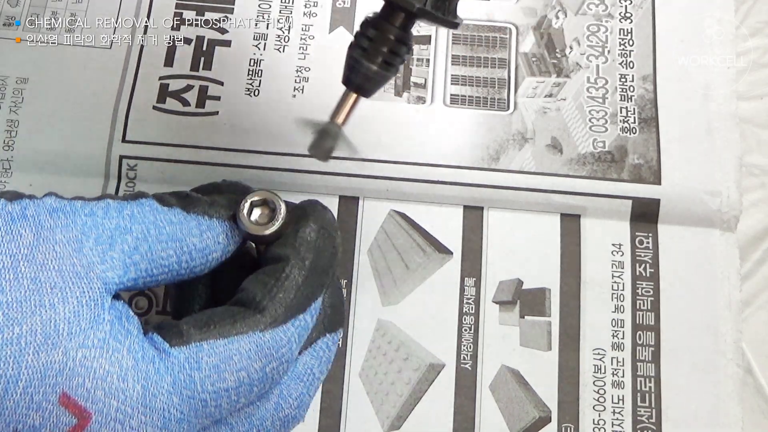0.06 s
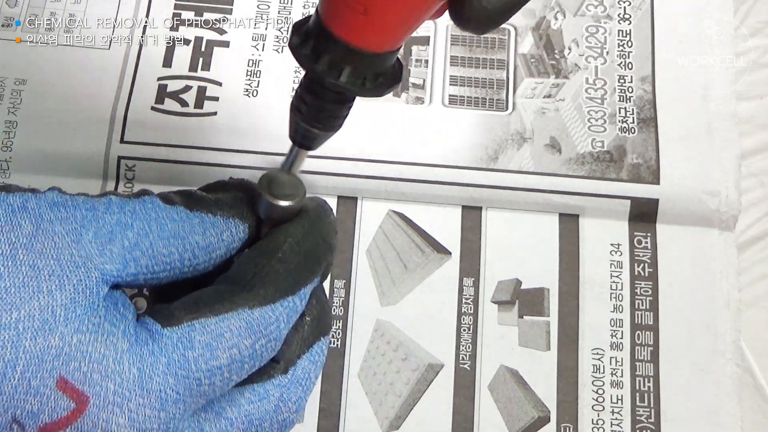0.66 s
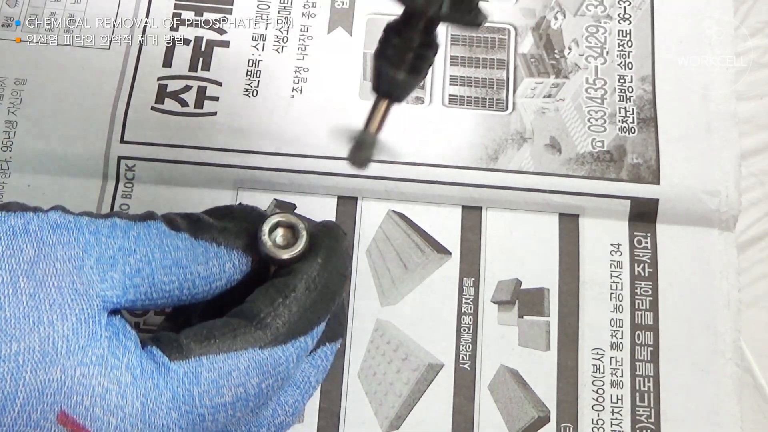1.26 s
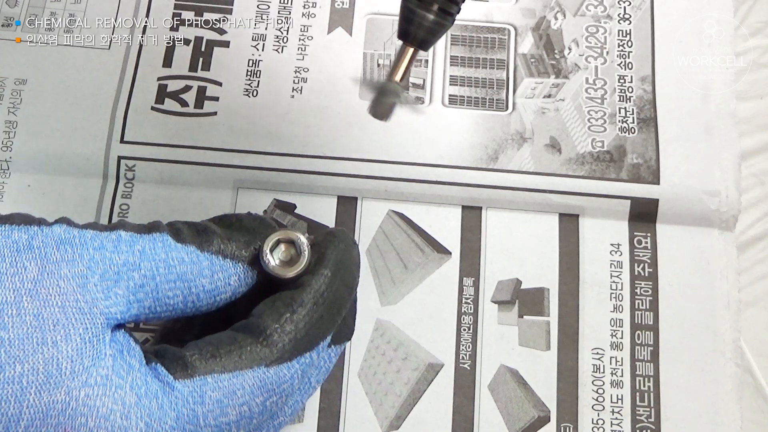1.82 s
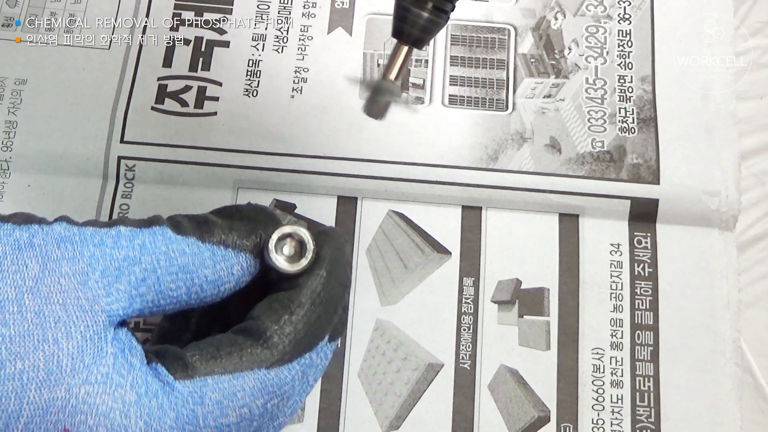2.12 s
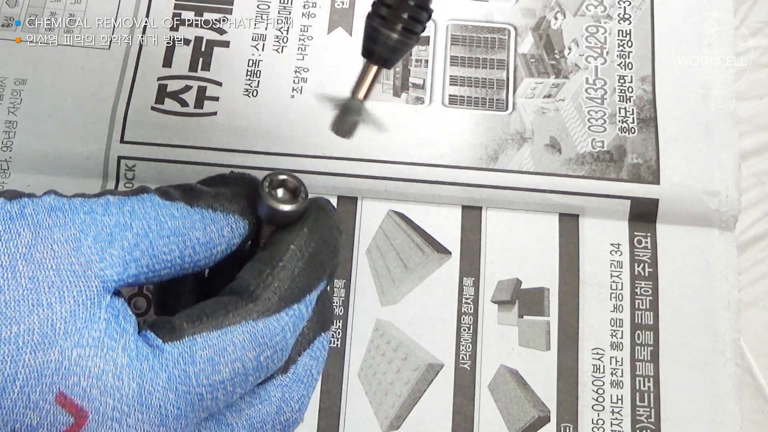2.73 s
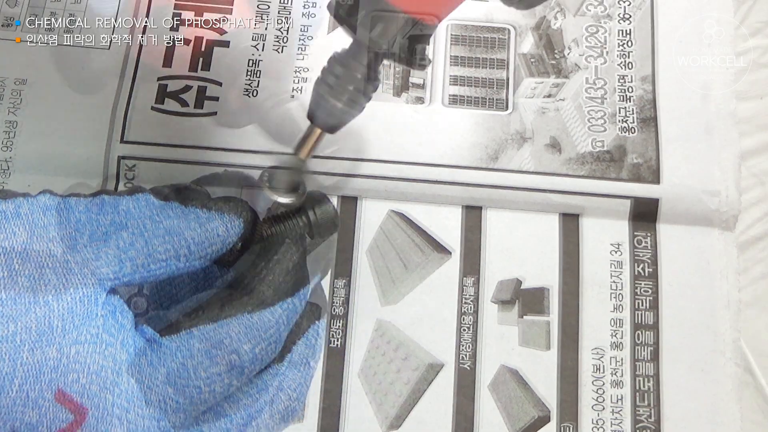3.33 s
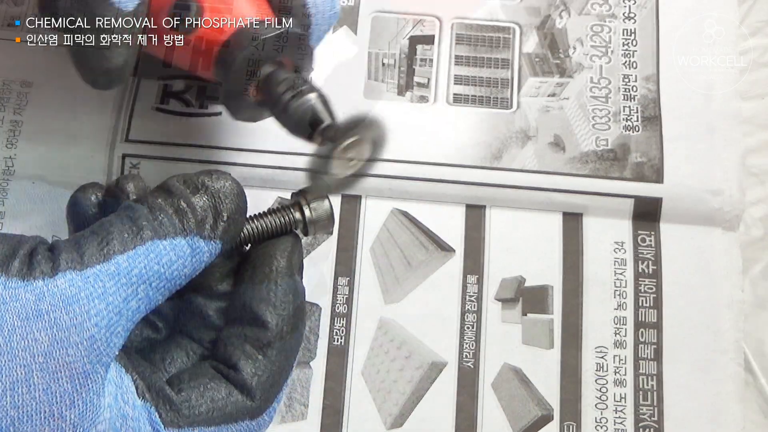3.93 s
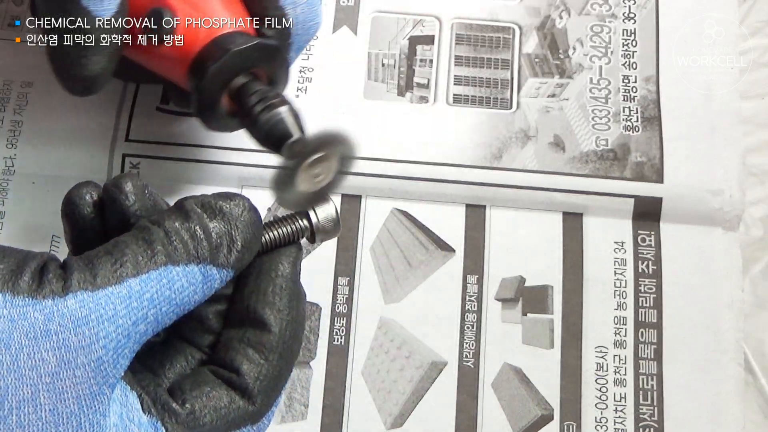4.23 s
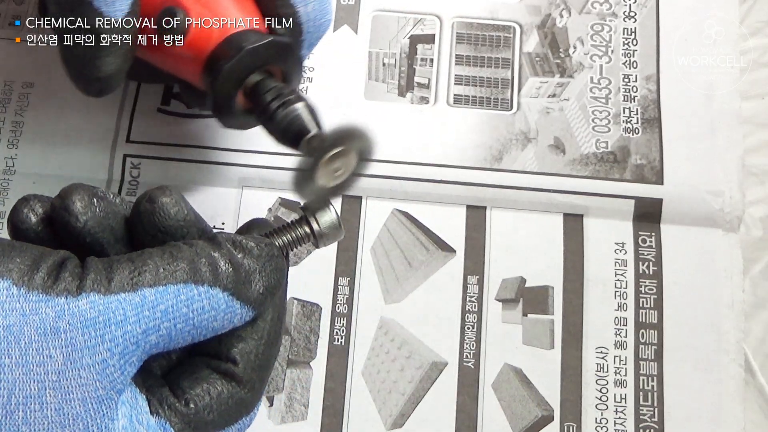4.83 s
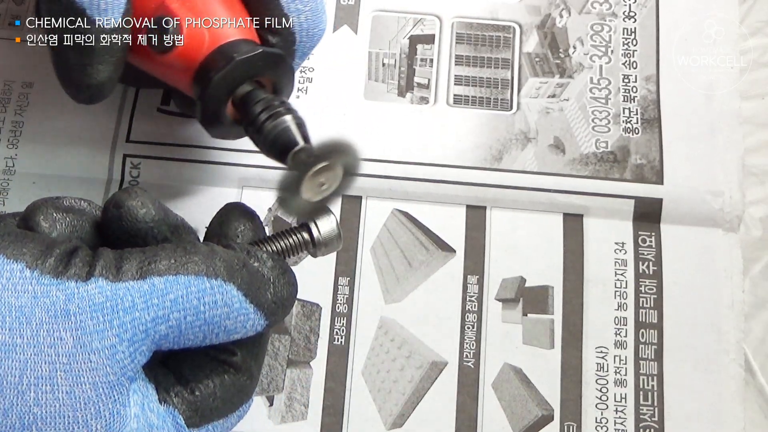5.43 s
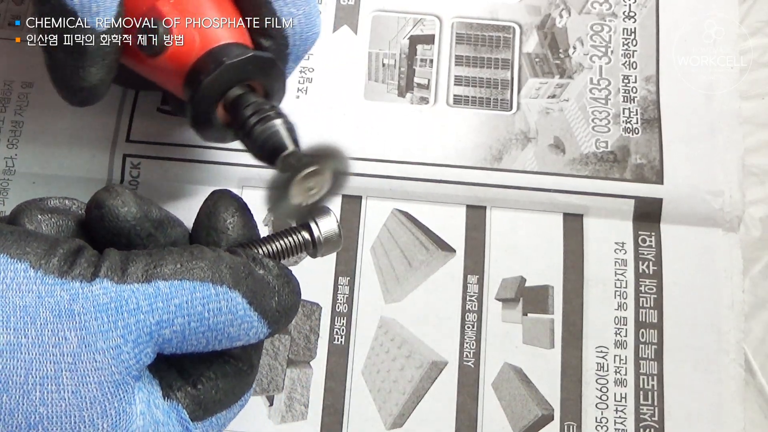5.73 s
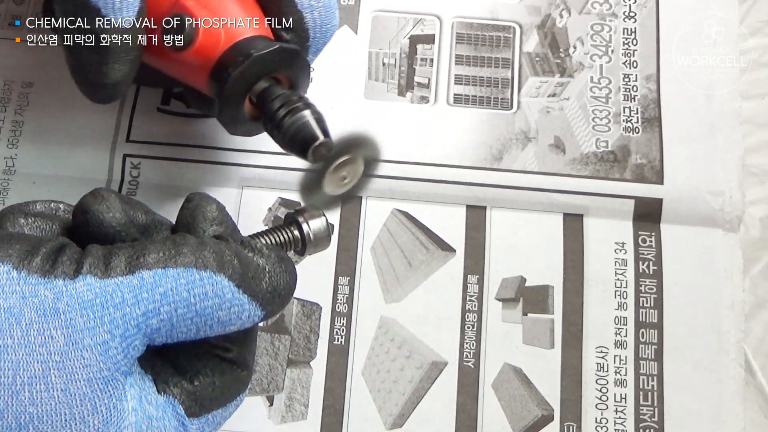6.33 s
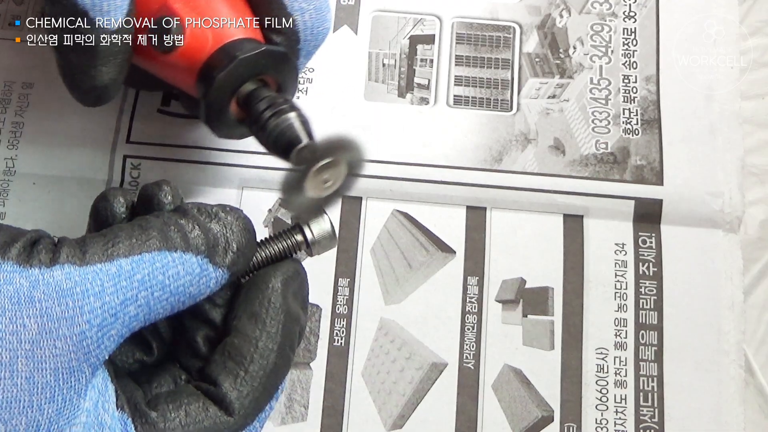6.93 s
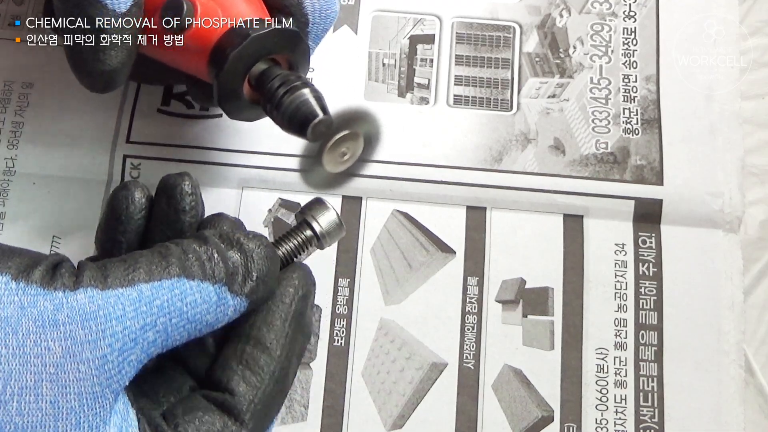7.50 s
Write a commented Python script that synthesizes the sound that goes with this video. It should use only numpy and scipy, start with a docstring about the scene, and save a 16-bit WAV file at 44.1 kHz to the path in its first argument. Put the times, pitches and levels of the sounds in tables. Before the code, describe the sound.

A handheld rotary tool whines high and hisses as wire brushes scrub a steel bolt, briefly spinning free at a lower pitch in between.

```python
"""A handheld rotary tool cleans a steel bolt with wire brushes, close by. First an end brush skims the
head, hurried and high-pitched: shaft, eight-bar commutator and ball bearings whine over fan air and
wire scratch. At 1.2 s this cuts to the tool spinning free at natural pace, much lower, creeping up.
From 3.1 s it loses speed and cuts out at 4.1 s, leaving a faint hush. Also from 3.1 s to the end,
a wire wheel works the thread, hurried and high again, its whine sagging under every press."""
import sys
import numpy as np
from scipy import signal
from scipy.fft import rfft, irfft, next_fast_len
from scipy.io import wavfile

SR = 44100
rng = np.random.default_rng(int(sys.argv[2]) if len(sys.argv) > 2 else 0)


def write(x):
    x = np.atleast_2d(x).T
    wavfile.write(sys.argv[1], SR, np.round(np.clip(x, -1, 1) * 32767).astype(np.int16))


N = 337806

MAINS_PULSE_HZ, HURRY = 120, 3.4  # in the hurried stretches, the mains pulses come HURRY times faster
EDGE_HZ = 15780  # top of the audible band
BALL_PASS = 4.362  # bearing ball passes per shaft turn

# End brush pushed onto the bolt head: start t/s, length t/s, drag/share of free speed
TIP_PRESSES = [(0, .25, .022), (.246, .064, .147), (.615, .65, .05), (.68, .6, .058)]
# Bed of steadier whine: f/shaft speed, relative level/dB
TIP_TONES = [(3.362, -46.5), (4, -48.5), (5, -69), (6, -61), (6.362, -55.5), (7.362, -54.5), (7.724, -47),
             (8.362, -51), (8.724, -46.5), (9, -66), (9.724, -50), (10, -62), (10.724, -58), (11, -50),
             (11.086, -48), (11.724, -55), (12, -57), (12.724, -45), (13, -58), (13.086, -54)]
# Lead voices, a row per LEAD_ORDERS entry: unloaded relative level/dB, level/dB gained per unit drag
TIP_LEAD = [(-62, -48), (-76.5, 25), (-42, -14), (-42, 5), (-45.5, 16), (-47, 24)]
# Peaks and notches of the held tool that the leads glide through: f/Hz, width f/Hz, level/dB of boost
TIP_COLOUR = [(1112, 116, -16.6), (1264, 69, 4.6), (5009, 152, 4.9), (5314, 78, -8.3), (6344, 157, 4.7),
              (6915, 253, 5.4), (8942, 639, -8.4), (10114, 288, -4.0), (13878, 626, -9.5),
              (14575, 297, 8.0)]
# Bright rush of fan air and wires: f/Hz, relative level/dB per Hz
TIP_RUSH = [(900, -138), (1600, -128), (2000, -108), (2800, -96.5), (3600, -84.5), (5000, -77), (5700, -74),
            (6700, -84), (8200, -86), (9300, -84), (11000, -81.5), (13000, -84), (15700, -78)]


def tip_brush():
    """The small end brush skims the bolt head, hurried; it snags briefly and the whine dips in pitch."""
    span = 0, 1.192
    speed = labour(TIP_PRESSES, span, start_hz=1114, free_hz=1338, tremor=.005, tremor_hz=21)
    t, hz, turns = shaft(speed, *span, jitter=0.00078, jitter_hz=59.7)
    snag = [(.05, 2), (.1, 2.5), (.19, 1.5), (.22, 2), (.265, 1.5), (.29, 2), (.33, 1.5), (.36, 4.5),
            (.41, 2)]  # t/s, level/dB added to the whine
    tones = whine(t, turns, TIP_TONES, HURRY, flutter=0.25, flutter_hz=39.74, sidebands=TIP_SIDEBANDS)
    leading = lead(t, hz, turns, drag(TIP_PRESSES, t), TIP_LEAD, TIP_COLOUR,
                   shaft_flutter=.04, flutter=0.13, flutter_hz=51.5, chatter_db=21, chatter_hz=69.7)
    motor = (amp(-3.4) * tones + amp(-1.04) * leading) * amp(curve(snag, t)[0])
    rush = noise(TIP_RUSH, len(t), ripple_db=4.0, ripple_hz=59.9)
    rush *= throb(t, turns, HURRY, turn_depth=0.086, mains_depth=0.16)
    ring = rim_scrape(t, ring_db=-68.5)
    haze = rattle(hz, turns, TIP_RUSH, over_db=21.5, low_hz=5800, count=20)
    sound = motor + amp(-2.0) * rush + ring + haze
    return place(t, sound, side_db=-20.5, balance_db=-0.8, room_db=-17.5, apart_hz=2000)


# Wheel on the thread, long strokes with short bites on top: start t/s, length t/s, drag/share of speed
WHEEL_PRESSES = [(3.205, 0.58, 0.106), (3.397, 0.372, 0.079), (3.891, 1.276, 0.136), (4.01, 0.104, 0.107),
                 (4.203, 0.09, 0.092), (4.259, 0.265, 0.082), (4.662, 0.479, 0.055), (4.825, 0.317, 0.044),
                 (5.225, 1.272, 0.182), (5.384, 0.047, 0.241), (5.62, 0.191, 0.119), (6.009, 0.154, 0.093),
                 (6.646, 0.096, 0.175), (6.678, 0.468, 0.143), (6.883, 0.347, 0.074)]
# Bed of rough whine: f/shaft speed, relative level/dB
WHEEL_TONES = [(3, -55.5), (3.362, -54.5), (4, -56), (5, -54), (6, -51.5), (6.362, -63), (7, -58),
               (7.724, -52), (8.362, -61), (8.724, -66), (9, -52), (9.362, -53.5), (9.724, -46), (10, -56),
               (10.362, -53.5), (10.724, -50), (11, -56), (11.724, -53), (12, -55.5), (12.724, -47),
               (13, -50.5), (13.086, -53), (14, -45), (14.086, -49.5), (14.724, -49), (15, -49),
               (15.086, -46), (16, -41.5)]
# Lead voices, a row per LEAD_ORDERS entry: unloaded relative level/dB, level/dB gained per unit drag
WHEEL_LEAD = [(-67, -6.5), (-61.5, 18.5), (-49, 10), (-48, 2), (-49.5, -6.5), (-49, 9.5)]
# Peaks and notches of the held tool that the leads glide through: f/Hz, width f/Hz, level/dB of boost
WHEEL_COLOUR = [(907, 54, -27), (984, 23, 5), (1143, 182, 13), (1858, 286, 8), (3964, 170, 9),
                (4215, 234, 6), (4537, 210, 5), (4560, 98, -0.5), (5150, 91, -3), (6350, 580, 7.5),
                (7130, 1300, 11), (7815, 320, 4), (12250, 700, 5.5), (14000, 714, 11.5)]
# Hiss of fan air and wires: f/Hz, relative level/dB per Hz
WHEEL_RUSH = [(800, -127), (1400, -123), (1650, -108), (2000, -77.5), (2500, -82), (3300, -79.5),
              (4300, -75.5), (5300, -82), (6300, -76), (8300, -80.5), (9300, -75), (11200, -77.5),
              (13500, -72), (15700, -72)]


def wheel_brush():
    """The wire wheel works the thread, hurried; pressure slows the shaft and brings up the scratch."""
    span = 3.098, 7.67
    speed = labour(WHEEL_PRESSES, span, start_hz=1260, free_hz=1225, tremor=.026, tremor_hz=19)
    t, hz, turns = shaft(speed, *span, jitter=.0014, jitter_hz=110)
    pressure = np.clip((1020 - hz) / 100, -1, 1.5)  # the slower the shaft, the harder the push
    tones = whine(t, turns, WHEEL_TONES, HURRY, flutter=0.46, flutter_hz=36.01,
                  sidebands=WHEEL_SIDEBANDS)
    leading = lead(t, hz, turns, drag(WHEEL_PRESSES, t), WHEEL_LEAD, WHEEL_COLOUR,
                   shaft_flutter=0.17, flutter=0.13, flutter_hz=50.22, chatter_db=9.5, chatter_hz=54.9)
    motor = amp(-0.64) * housing(tones) + amp(0.83) * leading
    rush = noise(WHEEL_RUSH, len(t), ripple_db=2.2, ripple_hz=50)
    rush *= amp(0.63 * pressure + .5 * wander(len(t), SR / 25))
    wires = [(1000, -135), (1700, -108), (2000, -105), (3000, -92), (4200, -93), (5500, -97),
             (15000, -86)]  # f/Hz, relative level/dB per Hz
    scratch = noise(wires, len(t), ripple_db=1.0, ripple_hz=58.6) * np.maximum(pressure, 0) ** 2
    hiss = amp(-6.3) * rush + amp(-2) * scratch
    hiss *= throb(t, turns, HURRY, turn_depth=0.05, mains_depth=0.25)
    haze = rattle(hz, turns, WHEEL_RUSH, over_db=10, low_hz=4950, count=16)
    return place(t, motor + hiss + haze, side_db=-15.5, balance_db=0.0, room_db=-19.0, apart_hz=1200)


# Slow climb with the brush lifted off: t/s, shaft f/Hz
IDLE_SPEED = [(1.2, 336.5), (1.22, 334.3), (1.35, 340.2), (1.62, 348.8), (1.97, 357.6), (2.15, 360.3),
              (2.46, 363.7), (2.89, 367.4), (3.09, 368.2)]
# Dense, clean whine of shaft and bearings: f/shaft speed, relative level/dB
IDLE_TONES = [(1, -57), (2, -95), (3.362, -45), (4, -48.5), (4.362, -40.5), (5.362, -48), (6, -60.5),
              (6.362, -50.5), (7.724, -45), (8, -45.5), (8.362, -66), (8.724, -59), (9, -62),
              (9.362, -54.5), (9.724, -47), (10, -73), (10.086, -52), (11.724, -48), (12.086, -45.5),
              (13, -50), (13.086, -50), (14, -55), (14.086, -47.5), (15, -60), (15.086, -56), (15.448, -52),
              (16, -49), (16.086, -38.5), (16.448, -44), (17, -67), (17.086, -42.5), (17.448, -45.5),
              (18, -45), (18.086, -44), (18.448, -45.5), (19.448, -48), (19.81, -45), (20.448, -50),
              (20.81, -40), (21, -46.5), (21.448, -59), (22, -47), (22.81, -52.5), (23, -74),
              (23.81, -55.5), (24, -47), (24.81, -67), (25, -58), (25.172, -53), (25.81, -65), (26, -61),
              (26.172, -52), (26.81, -45), (27, -54), (27.172, -65), (27.534, -56), (28, -68),
              (28.172, -48.5), (29, -58), (29.172, -55), (29.534, -68), (30.172, -64)]
# Breath of the fan: f/Hz, relative level/dB per Hz
IDLE_RUSH = [(170, -123), (300, -103), (550, -94), (850, -88), (1100, -78.5), (1500, -67), (1750, -72.5),
             (2300, -80.5), (3000, -77), (4600, -74.5), (6300, -71), (8200, -75), (10500, -73),
             (15700, -87.5)]


def idling():
    """The tool spins freely and creeps up in speed."""
    t, hz, turns = shaft(IDLE_SPEED, start=1.188, end=3.102, jitter=0.00052, jitter_hz=25.63)
    tones = whine(t, turns, IDLE_TONES, pace=1, flutter=0.12, flutter_hz=16, sidebands=FREE_SIDEBANDS)
    rush = noise(IDLE_RUSH, len(t), ripple_db=4.5, ripple_hz=25.01)
    rush *= throb(t, turns, pace=1, turn_depth=0.16, mains_depth=0.098)
    haze = rattle(hz, turns, IDLE_RUSH, over_db=21.5, low_hz=2980, count=56)
    sound = amp(-1.02) * tones + amp(-1.73) * rush + haze
    return place(t, sound, side_db=-24.0, balance_db=-0.9, room_db=-16.5, apart_hz=553)


# Gentle droop of the motor running on: t/s, shaft f/Hz
SLOWING_SPEED = [(3.11, 352.4), (3.38, 352), (3.44, 349.8), (3.52, 344), (3.79, 331.9), (3.99, 324.3),
                 (4.11, 321.3)]
# Sparser, shakier whine: f/shaft speed, relative level/dB
SLOWING_TONES = [(1, -59.5), (2, -64.5), (3.362, -45), (4, -57), (4.362, -39.5), (5.362, -42), (8, -44.5),
                 (8.362, -61), (9.724, -43.5), (10, -49), (10.086, -43), (12.086, -43.5), (14, -50),
                 (14.086, -58), (16, -58), (16.086, -39), (16.448, -40), (17.086, -51), (18, -42),
                 (18.086, -40), (18.448, -53), (19.448, -49), (19.81, -57), (20.81, -39), (21, -54),
                 (27.172, -43.5)]
# Breath of the fan: f/Hz, relative level/dB per Hz
SLOWING_RUSH = [(170, -117), (300, -101), (550, -89.5), (850, -86), (1100, -77.5), (1500, -64.5),
                (1750, -75.5), (2300, -75), (3000, -73), (4600, -71), (6300, -68.5), (8200, -71.5),
                (10500, -72), (15700, -97)]


def slowing():
    """The motor loses speed with a stronger mains buzz; the wires graze the bolt near the end."""
    t, hz, turns = shaft(SLOWING_SPEED, start=3.098, end=4.1, jitter=0.00075, jitter_hz=24.7)
    tones = whine(t, turns, SLOWING_TONES, pace=1, flutter=0.32, flutter_hz=18.44,
                  sidebands=FREE_SIDEBANDS)
    rush = noise(SLOWING_RUSH, len(t), ripple_db=3.0, ripple_hz=24.72)
    rush *= throb(t, turns, pace=0.99, turn_depth=0.15, mains_depth=0.26)
    wires = [(1500, -100), (2800, -78), (4200, -69.5), (6000, -83), (9000, -82)]  # f/Hz, level/dB per Hz
    graze = noise(wires, len(t), ripple_db=-4, ripple_hz=59.7) * bump(t, centre=3.95, width=0.24)
    haze = rattle(hz, turns, SLOWING_RUSH, over_db=11, low_hz=2750, count=40)
    sound = amp(-2.0) * tones + amp(-1.56) * rush + graze + haze
    return place(t, sound, side_db=-31.0, balance_db=-0.6, room_db=-14, apart_hz=550)


# Lead voices (unbalance, its octave, ball pass, ball pass + 1, commutator, 3 passes - 1): f/shaft speed
LEAD_ORDERS = [1, 2, 4.362, 5.362, 8, 12.086]
COMMUTATOR_BARS = 8


def lead(t, hz, turns, load, tones, colour, shaft_flutter, flutter, flutter_hz, chatter_db, chatter_hz):
    """The leading tones swell and fade as they glide through the tool's colour, and chatter under load."""
    out, pitch = 0, np.arange(0, 2 * EDGE_HZ, 2)
    response_db = sum(db * bump(pitch, centre, width) for centre, width, db in colour)
    for order, (free_db, load_db) in zip(LEAD_ORDERS, tones):
        chatter = chatter_db * wander(len(t), SR / chatter_hz)
        db = free_db + np.interp(order * hz, pitch, response_db) + load * (load_db + chatter)
        depth = shaft_flutter if order == 1 else flutter
        out += tone(order * turns, db, depth, flutter_hz, locked=order == COMMUTATOR_BARS)
    return out


# Buzz from mains pulses splitting the commutator tones: f/shaft speed, offset/mains steps
SIDEBAND_PLACES = [(8, -2), (8, -1), (8, 1), (8, 2), (8, 3), (16, -2), (16, -1), (16, 1)]
# Weight of that buzz, row by row: relative level/dB for end brush, free running, wheel
SIDEBAND_LEVELS = [(-65, -70, -47.5), (-57, -52.5, -43.5), (-56, -46.5, -51.5), (-56, -48.5, -56.5),
                   (-56, -50, -61), (-80, -76, -51), (-80, -76, -56.5), (-80, -77, -57)]
TIP_SIDEBANDS, FREE_SIDEBANDS, WHEEL_SIDEBANDS = np.transpose(SIDEBAND_LEVELS)


def whine(t, turns, tones, pace, flutter, flutter_hz, sidebands):
    """Bearing and shaft tones, plus the commutator's mains sidebands."""
    out = sum(tone(order * turns, db, flutter, flutter_hz) for order, db in tones)
    mean_hz = turns[-1] / (t[-1] - t[0])
    for (order, step), db in zip(SIDEBAND_PLACES, sidebands):
        if order * mean_hz < 1.1 * EDGE_HZ:
            cycles = order * turns + step * pace * MAINS_PULSE_HZ * t
            out += tone(cycles, db, 0.26, flutter_hz, locked=order == COMMUTATOR_BARS)
    return out


def tone(cycles, db, flutter, flutter_hz, locked=False):
    """One partial, fluttering as the balls slip; locked ones beat in step with the mains."""
    coarse = np.arange(0, len(cycles) + 64, 64)
    mean_hz = cycles[-1] / len(cycles) * SR
    flutter = flutter * (0.69 + mean_hz / 12000)  # high partials flutter more
    swell, slip = (wander(len(coarse), SR / 64 / flutter_hz) for _ in range(2))
    start_phase = 2 * np.pi * rng.random() * (not locked)
    sway = (1 + flutter * (swell + 1j * slip)) / np.sqrt(1 + 2 * flutter ** 2)
    sway = np.interp(np.arange(len(cycles)), coarse, sway * np.exp(1j * start_phase))
    angle = (2 * np.pi * (cycles - np.floor(cycles))).astype(np.float32)
    return np.sqrt(2) * amp(db) * (sway.real * np.cos(angle) - sway.imag * np.sin(angle))


def shaft(speed, start, end, jitter, jitter_hz):
    """Times, speed and summed turns of a slightly unsteady shaft."""
    t = np.arange(round(start * SR), min(round(end * SR), N)) / SR
    hz = curve(speed, t)[0]
    unsteady_hz = hz * (1 + jitter * wander(len(t), SR / jitter_hz))
    return t, hz, np.cumsum(unsteady_hz) / SR


def labour(presses, span, start_hz, free_hz, tremor, tremor_hz, lag_s=0.17):
    """The motor sags under each press, wobbles with the hand's tremor and recovers late: t/s, f/Hz."""
    t = np.arange(*span, 1 / SR)
    load, inertia = drag(presses, t), np.exp(-1 / (lag_s * SR))
    hz = start_hz + signal.lfilter([1 - inertia], [1, -inertia], free_hz * (1 - load) - start_hz)
    wobble = np.sin(2 * np.pi * tremor_hz * t + wander(len(t), 2 * SR / tremor_hz))
    return np.column_stack([t, hz * (1 + tremor * load * wobble)])


def drag(presses, t, grip_s=0.03):
    """Share of the free speed that the presses take away; each ramps in and out, and overlaps add up."""
    return sum(share * np.clip(np.minimum(t - start, start + length - t) / grip_s + .5, 0, 1)
               for start, length, share in presses)


# Body resonances under the wheel's whine: f/Hz, width f/Hz, level/dB of the added ring
HOUSING_MODES = [(3245, 26, -1), (3614, 62, 9), (3950, 135, 11.5)]


def housing(x):
    """Tones flare up as they glide through the resonances of the tool's body."""
    return x + sum(amp(db) * resonate(x, hz, width) for hz, width, db in HOUSING_MODES)


def rattle(hz, turns, rush, over_db, low_hz, count):
    """Bearing haze: faint tones at random sums of ball passes and turns, coloured like the rush."""
    balls, height, weakness = rng.random((count, 3)).T
    passes = BALL_PASS * np.floor(8 * balls)
    pitch = low_hz + height * (EDGE_HZ - low_hz)
    orders = passes + np.round(pitch / hz.mean() - passes)
    levels = curve(rush, pitch)[0] + over_db - 6 * weakness
    return sum(tone(order * turns, db, flutter=0.61, flutter_hz=15) for order, db in zip(orders, levels))


def throb(t, turns, pace, turn_depth, mains_depth):
    """Noise comes in puffs, once a turn and once a mains pulse."""
    turn_puffs = turn_depth * np.cos(2 * np.pi * turns)
    mains_puffs = mains_depth * np.cos(2 * np.pi * pace * MAINS_PULSE_HZ * t)
    return evened(np.exp(turn_puffs + mains_puffs))


# Faint ring that the end brush keeps alive: f/Hz, width f/Hz, relative level/dB
RIM_MODES = [(1720, 34, -8.5), (1930, 86, -5.5), (2204, 27, 4), (2430, 120, -10), (2590, 33, 0)]
# Accents where the bristles catch the rim: centre t/s, length t/s, level/dB of boost
RIM_CATCHES = [(0.004, 0.024, 13), (0.288, 0.019, 15), (0.656, 0.074, 9)]


def rim_scrape(t, ring_db):
    """Bristles on the rim stir a few narrow resonances, harder where they catch."""
    catch_db = sum(db * bump(t, centre, length) for centre, length, db in RIM_CATCHES)
    push = rng.standard_normal(len(t)) * amp(catch_db)
    ring = sum(amp(db) * resonate(resonate(push, hz, 2 * width), hz, width)
               for hz, width, db in RIM_MODES)
    return amp(ring_db) * evened(ring)


def place(t, sound, side_db, balance_db, room_db, apart_hz):
    """Cuts a stretch in and out in stereo; phase spread and a faint room widen it above apart_hz."""
    lag = np.arange(6000)
    echoes = rng.standard_normal(len(lag)) * np.exp(-lag / 2000) * (lag > 200)
    room = amp(room_db) * signal.oaconvolve(sound, echoes / np.linalg.norm(echoes))[:len(t)]
    spread = amp(side_db) * signal.hilbert(sound, next_fast_len(len(t))).imag[:len(t)]
    side = signal.filtfilt(*signal.butter(1, apart_hz, "high", fs=SR), spread + room)
    pair = np.array([sound * amp(balance_db / 2) + side, sound * amp(-balance_db / 2) - side])
    first = round(t[0] * SR)
    return np.pad(pair * signal.windows.tukey(len(t), 200 / len(t)), ((0, 0), (first, N - first - len(t))))


def hush(stop_s=4.1, fall_db_per_s=55):
    """A faint low hush dies away after the slowing motor cuts out."""
    since = np.arange(N) / SR - stop_s
    # f/Hz, level/dB per Hz
    body = [(170, -122), (300, -109), (550, -105), (900, -104), (1500, -102), (2000, -112)]
    air = noise(body, N, ripple_db=2.5, ripple_hz=40)
    return air * amp(-fall_db_per_s * abs(since)) * np.clip(1 + since / 0.014, 0, 1)


# Dark, quiet bed of the room: f/Hz, level/dB per Hz
ROOM_TONE = [(20, -110), (100, -112), (150, -131), (300, -134), (400, -127), (520, -125), (680, -137),
             (1000, -137), (16000, -138)]


def room_tone():
    """A steady, barely audible rumble under everything."""
    return noise(ROOM_TONE, N, ripple_db=2.0, ripple_hz=30)


def noise(spectrum, size, ripple_db, ripple_hz):
    """Noise of a given density, cut off below its first point and rippled by small fixed resonances."""
    length = next_fast_len(size)
    hz = np.fft.rfftfreq(length, 1 / SR)
    points_hz, db = np.transpose(spectrum)
    shape_db = np.interp(np.log(hz + 1), np.log(points_hz), db, left=-np.inf)
    shape_db += ripple_db * wander(len(hz), ripple_hz / hz[1])
    return irfft(rfft(rng.standard_normal(length)) * amp(shape_db) * np.sqrt(SR / 2), length)[:size]


def wander(size, step):
    """Smooth random drift of rms about 1, with knots at least step samples apart."""
    knots = rng.standard_normal(4096)
    return 1.256 * np.interp(np.arange(size) / max(step, size / 4000), np.arange(len(knots)), knots)


def resonate(x, hz, width):
    """One resonance with unit gain at its peak."""
    return signal.lfilter(*signal.iirpeak(hz, hz / width, SR), x)


def curve(rows, at):
    """A table's later columns read along its first, joined by straight lines."""
    points, *columns = np.transpose(rows)
    return [np.interp(at, points, column) for column in columns]


def bump(x, centre, width):
    """A bell curve of height 1."""
    return np.exp(-(2 * (x - centre) / width) ** 2)


def amp(db):
    """Decibels to gain."""
    return 10 ** (np.asarray(db) / 20)


def evened(x):
    """Scales to rms 1."""
    return x / np.sqrt(np.mean(x ** 2) + 1e-20)


def scene():
    """The four stretches of the tool over a quiet room."""
    return tip_brush() + idling() + slowing() + wheel_brush() + hush() + room_tone()


def record(dry):
    """A steep low-pass takes off the very top."""
    lowpass = signal.firwin(1023, EDGE_HZ, window=("kaiser", 9), fs=SR)
    return signal.oaconvolve(dry, lowpass[None], "same")


dry = scene()
out = record(dry)
write(out)
```